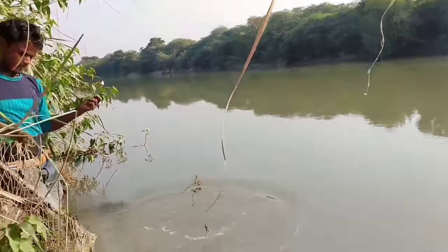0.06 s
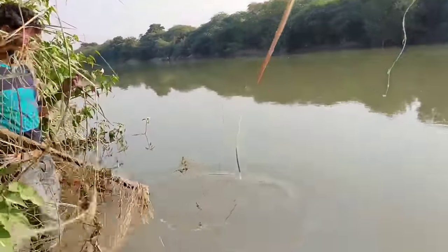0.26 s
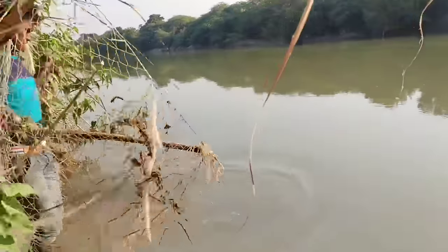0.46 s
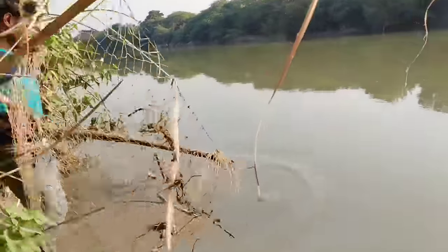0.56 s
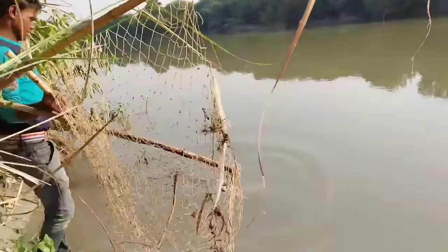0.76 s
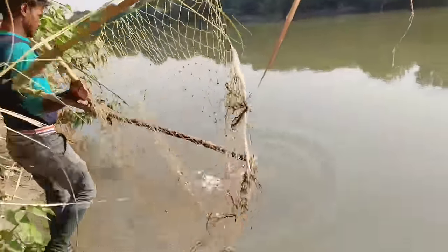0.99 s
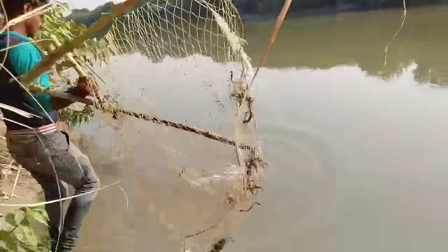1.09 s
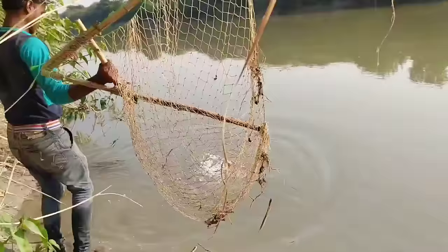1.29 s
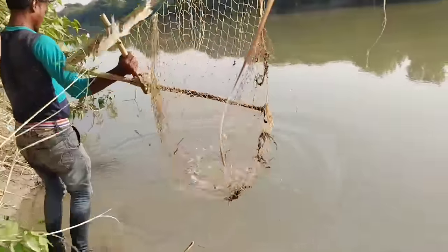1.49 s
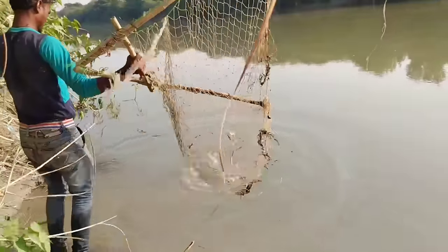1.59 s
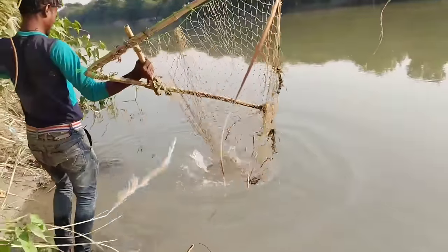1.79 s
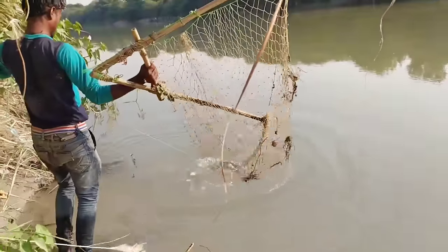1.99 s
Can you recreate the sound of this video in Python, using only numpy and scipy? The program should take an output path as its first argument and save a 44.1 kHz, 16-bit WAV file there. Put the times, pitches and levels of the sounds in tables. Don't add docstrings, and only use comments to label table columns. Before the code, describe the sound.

Close stereo outdoors by a river: crackly net dragged through grass with stalks clicking, then midway a fish smacks the water, gurgling and frothing in short bursts while rustling continues, above a quiet low hum.

```python
import sys
import numpy as np
from scipy import signal
from scipy.io import wavfile
from scipy.ndimage import uniform_filter1d

SR = 44100
rng = np.random.default_rng(int(sys.argv[2]) if len(sys.argv) > 2 else 0)


def materialize(psi):
    bounded = np.clip(np.atleast_2d(psi).T, -1, 1)
    quanta = np.round(bounded * 32767).astype(np.int16)
    wavfile.write(sys.argv[1], SR, quanta)


def invert_db(x):
    u = np.asarray(x, float) / 20
    return 10 ** u


N = 90404


def evened(x):
    return x / np.sqrt(np.mean(x ** 2) + 1e-20)


def read(points, hz):
    f, value = np.transpose(points)
    return np.interp(np.log(hz + 1), np.log(f + 1), value)


def add(mix, s, sound):
    part = mix[round(s * SR):][:len(sound)]
    part += sound[:len(part)]


def colour(x, db):
    hz = abs(np.fft.fftfreq(4096, 1 / SR))
    log_gain = np.log(invert_db(np.maximum(db(hz), -100)))
    taps = np.fft.ifft(np.exp(np.conj(signal.hilbert(log_gain)))).real[:2048]
    return signal.oaconvolve(x, taps)[:N]


def pair(a, b, same, lag, patch_db, size):
    hz, t, z = signal.stft(np.array([a, b]), SR, nperseg=size)
    likeness = np.clip(read(same, hz), 0, 1)[:, None]
    patches = uniform_filter1d(rng.standard_normal(z.shape[1:]), 5, 0)
    patches = evened(uniform_filter1d(patches, 9, 1))
    delay = np.exp(-2j * np.pi * hz * lag / SR)[:, None]
    left = likeness * z[0] * delay + np.sqrt(1 - likeness ** 2) * z[1]
    both = np.array([left, z[0]]) * invert_db(patch_db * patches)
    return signal.istft(both, SR, nperseg=size)[1][:, :N]


def hum():
    # (frequency [Hz], level [dB per Hz])
    hum_spectrum = [(12, -35.5), (20, 4.5), (77, -6), (123, -13), (174, -2.5), (633, -19), (686, -16.5),
                    (1160, -22), (2500, -14), (3250, -18), (5500, -120)]
    # (frequency [Hz], likeness [0-1])
    hum_same = [(25, 0.69), (60, 0.73), (200, 0.84), (500, 0.44), (1200, 0.085), (2500, 0.045)]
    bump_hz, bump_width, bump_db = 169, 0.091, 0.5

    def shape(hz):
        bump = bump_db * np.exp(-(np.log(hz / bump_hz + 1e-9) / bump_width) ** 2)
        return read(hum_spectrum, hz) + bump - 30 * (hz > 3000)

    a, b = (colour(noise, shape) for noise in rng.standard_normal((2, N)))
    return invert_db(-51) * evened(pair(a, b, hum_same, lag=0, patch_db=.6, size=1024))


def crackle(spread_db):
    ticks_per_s = 12000
    unevenness = np.minimum(rng.exponential(1, N), 5)
    size = invert_db(spread_db * unevenness) * rng.standard_normal(N)
    return evened(size * (rng.random(N) < ticks_per_s / SR))


def ticks(level, points, spread_db):
    # (frequency [Hz], likeness [0-1])
    rustle_same = [(900, 0.71), (3000, 0.23), (8000, 0.026), (15000, 0.4)]
    impulse = np.zeros(4096)
    impulse[0] = 1

    def shape(hz):
        return read(points, hz) - 30 * (hz < 700)

    gain = np.linalg.norm(colour(impulse, shape))
    sides = [colour(level * crackle(spread_db), shape) / gain for _ in "LR"]
    return pair(*sides, rustle_same, lag=22, patch_db=1.2, size=256)


def streaked(x):
    # (frequency [Hz], depth [dB])
    streak_depth = [(2200, 0), (3200, 8), (6200, 7.5), (7300, 2), (10500, 2), (12500, 5.5), (15500, 6)]
    hz, t, z = signal.stft(x, SR, nperseg=1024)
    field = rng.standard_normal((1, 129, len(t))).repeat(4, 1)[:, :513]
    field = evened(uniform_filter1d(field, size=3, axis=2))
    depth = read(streak_depth, hz)[:, None]
    gain = invert_db(depth * np.minimum(field, .8))
    return signal.istft(z * gain, SR, nperseg=1024)[1][:, :N]


def net():
    # (time [s], level [dB])
    drag_level = [(0, -46.5), (.19, -42), (.28, -41.5), (.39, -29.5), (.45, -30.5), (.55, -37.5),
                  (.68, -33), (.78, -41.5), (.87, -40), (.95, -42), (1.08, -37), (1.24, -34.5),
                  (1.31, -42.5), (1.36, -31), (1.57, -37.5), (1.66, -43), (1.72, -39), (1.82, -45)]
    # (time [s], level [dB], length [s], dull share [0-1])
    stalks = [(0.118, -44, 0.0055, 0), (0.2201, -23.5, 0.0016, 0.17), (.2223, -26, 0.0009, 0.1),
              (0.2235, -16, 0.0011, 0.02), (0.405, -29, 0.02, 0), (0.417, -28.5, 0.019, 0),
              (.44, -42, 0.027, 0), (0.516, -36, .002, .3), (0.5197, -25, .0045, 0.53),
              (0.5223, -28, 0.0072, 0.33), (0.577, -29, 0.0045, 0.27), (0.646, -40, 0.022, 0),
              (0.814, -31, 0.0033, 0), (0.86, -38.5, 0.011, 0), (0.911, -34.5, 0.0046, 0),
              (0.954, -37.5, 0.0044, .1), (1.123, -38, 0.0046, 0.56), (1.247, -41, 0.036, 0.04),
              (1.3274, -39.5, .013, 0), (1.3648, -33.5, .006, 0.2), (1.455, -36.5, 0.029, 0.2),
              (1.4875, -35, 0.0042, 0.1), (1.522, -38, 0.03, 0.23), (1.532, -35, .004, 0.1),
              (1.553, -35.5, 0.036, 0.03), (1.568, -37, 0.0048, 0), (1.639, -44, .004, 0.2),
              (1.684, -33.5, 0.009, 0.28), (1.7, -29.5, 0.002, 0.23), (1.703, -39, 0.023, 0),
              (1.709, -37, 0.0047, 0), (1.727, -40, 0.0048, 0), (1.75, -40, .005, 0.1),
              (1.771, -39, 0.0046, 0.1), (1.8811, -39, 0.0054, .1), (1.9919, -59, .005, 0)]
    # (frequency [Hz], level [dB per Hz])
    fibre_spectrum = [(2500, -43.5), (4000, -29.5), (5200, -16), (6300, -13.5), (8580, -2.5), (11000, -12),
                      (15600, -20.5)]
    blade_spectrum = [(530, -47), (1040, -5.5), (1600, -15), (2510, 0.5), (3250, -7), (4000, -1.5),
                      (5800, -7), (8000, -23)]
    snap_spectrum = [(700, -59), (1500, -25), (2300, -20.5), (4200, -14.5), (6500, -1), (9000, 2),
                     (12000, -10), (15700, -22)]
    thick_spectrum = [(700, -19), (1500, -13.5), (2200, 0), (3200, -10), (4600, -4), (6000, -9),
                      (9000, -12), (15700, -9.5)]
    # (frequency [Hz], level [dB])
    bright_left = [(3000, .5), (5500, -1.2), (9000, -.6), (15000, 4.5)]
    rise_s, tail_s, tail_db = .0004, .006, -13
    scrape_over_s = .012
    flicker_db, spread_db = .6, 1.9

    t = np.arange(N) / SR
    flicker = uniform_filter1d(rng.standard_normal(N), 500)
    flicker = evened(uniform_filter1d(flicker, 300))
    drag = invert_db(np.interp(t, *np.transpose(drag_level)) + flicker_db * flicker) ** 2
    bright, dull = np.zeros(N), np.zeros(N)
    u = t[:4000]
    for s, db, length, share in stalks:
        tail = invert_db(tail_db) * np.exp(-(u - length) / tail_s).clip(0, 1)
        shape = np.minimum(u / rise_s, 1) * np.maximum(u < length, tail)
        target = drag if length > scrape_over_s else bright
        add(target, s, (invert_db(db) * shape) ** 2)
        add(dull, s, (share * invert_db(db) * shape) ** 2)

    swish = invert_db(-50) * (np.sqrt(drag) / invert_db(-38)) ** 0.51
    rustle = ticks(np.sqrt(drag), fibre_spectrum, spread_db)
    rustle = rustle + ticks(swish, blade_spectrum, spread_db)
    snaps = ticks(np.sqrt(bright), snap_spectrum, 0)
    thuds = ticks(np.sqrt(dull), thick_spectrum, 0)
    left, right = streaked(rustle) + snaps + thuds
    left = colour(left, lambda hz: read(bright_left, hz) / 2)
    right = colour(right, lambda hz: -read(bright_left, hz) / 2)
    return np.array([left, right])


def bubble(db, hz, length):
    climb, skew = .08, .7
    u = np.arange(0, length, 1 / SR) / length
    turns = hz * length * (u * (1 - climb / 2) + climb * u ** 2 / 2)
    swell = abs(np.sin(np.pi * u ** skew))
    return invert_db(db) * swell * np.sin(2 * np.pi * turns)


def froth():
    # (start [s], length [s], level [dB])
    churn = [
        (1.122, 0.24, -48.5),
        (1.296, 0.11, -51.5),
        (1.37, 0.08, -44.5),
        (1.419, 0.2, -48),
        (1.597, 0.08, -53.5),
        (1.758, 0.031, -50.5),
        (1.842, .24, -51),
    ]
    bubbles_per_s, spread_db, tilt_db_per_octave = 1800, 2.5, 1.5
    t, level = np.arange(N) / SR, np.zeros(N)
    for s, length, db in churn:
        u = np.clip((t - s) / length, 0, 1)
        level += invert_db(db) * abs(np.sin(np.pi * u ** 0.54)) ** .5
    size = invert_db(spread_db * np.minimum(rng.exponential(1, N), 4))
    size = size * (rng.random(N) < bubbles_per_s / SR)
    kind = rng.integers(0, 30, N)
    steady, churned = np.zeros(N), np.zeros(N)
    for k, hz in enumerate(np.geomspace(420, 3000, 30)):
        tone = bubble(tilt_db_per_octave * np.log2(hz / 1000), hz, 6 / hz + 0.004)
        births = size * (kind == k)
        steady += signal.oaconvolve(births, tone)[:N]
        churned += signal.oaconvolve(births * level, tone)[:N]
    return churned / np.std(steady)


def slap():
    # (frequency [Hz], level [dB per Hz])
    smack_spectrum = [(150, -12), (500, -7), (1300, -8), (2500, -4), (3500, -14), (8000, -37)]
    smack_s, smack_db, smack_rise_s, smack_fade_s = 1.1205, -31, 0.00084, .0045
    cavity_s, cavity_db, cavity_hz, cavity_rise_s, cavity_fade_s = 1.123, -33, 158, .008, .05
    t, out = np.arange(8000) / SR, np.zeros(N)
    puff = colour(rng.standard_normal(8000), lambda hz: read(smack_spectrum, hz))
    puff = evened(puff[:8000])
    envelope = np.minimum(t / smack_rise_s, 1) * np.exp(-t / smack_fade_s)
    add(out, smack_s, invert_db(smack_db) * puff * envelope)
    ring = (1 - np.exp(-t / cavity_rise_s)) * np.exp(-(t / cavity_fade_s) ** 1.7)
    add(out, cavity_s, invert_db(cavity_db) * ring * np.sin(2 * np.pi * cavity_hz * t))
    return out


def fish():
    # (time [s], level
    # [dB], pitch [Hz], length [s])
    cavities = [(1.12, -35.5, 1255, .009), (1.121, -34, 885, 0.01), (1.121, -32.5, 390, 0.0062),
                (1.123, -27.5, 618, 0.0093), (1.121, -36.5, 2400, 0.0056), (0.8, -42, 1900, 0.007),
                (1.4, -46, 1400, .005), (1.135, -41, 2080, 0.0051), (1.3, -38, 800, 0.0098),
                (1.134, -37, 560, 0.0091), (0.42, -55, 175, 0.041), (0.66, -45.5, 165, .04),
                (.255, -48.5, 217, 0.028), (.444, -49, 1050, 0.014), (.482, -45.5, 1900, 0.0082),
                (1.152, -44, 780, .012), (1.198, -38, 207, 0.013), (1.203, -46, 700, 0.018),
               (1.221, -41.5, 262, 0.013), (1.266, -43.5, 780, 0.0079), (1.294, -36.5, 975, 0.0088),
               (1.303, -39.5, 960, 0.007), (1.325, -26, 378.7, 0.022), (1.345, -43, 422, 0.035),
               (1.373, -35, 460, 0.011), (1.379, -39.5, 900, .009), (1.39, -34.5, 746, 0.0096),
               (1.401, -30, 690, 0.008), (1.408, -33, 740, 0.0058), (1.415, -41, 695, 0.0088),
               (1.433, -46, 1250, 0.0086), (1.506, -46, 1015, 0.025), (1.524, -49, 695, 0.012),
               (1.548, -52, 662, .012), (1.645, -48, 1430, 0.019), (1.675, -41.5, 584, 0.013),
               (1.777, -45.5, 800, 0.014), (1.858, -45.5, 740, .012), (1.866, -44, 1103, 0.012),
               (1.882, -47.5, 295, 0.026), (1.909, -40, 742, 0.018), (1.936, -39, 1750, 0.013),
               (1.945, -48.5, 1760, 0.017), (1.953, -45, 2480, 0.011), (1.959, -42, 1196, 0.0091),
               (1.836, -48, 2760, 0.012), (1.912, -49, 1160, .012), (1.956, -50, 393, 0.019),
               (1.39, -40.5, 398, 0.014), (1.397, -46, 600, 0.0055), (1.404, -41, 1790, 0.027),
               (1.41, -41, 1050, .008), (2.008, -52, 420, 0.013), (2.042, -40.5, 1740, 0.0078)]
    # (frequency [Hz], likeness [0-1])
    water_same = [(150, .99), (500, .97), (1000, .85), (1500, .5), (2500, .3)]
    mono = froth() + slap()
    for s, db, hz, length in cavities:
        add(mono, s, bubble(db, hz, length))
    scatter = rng.standard_normal(300) * np.exp(-np.arange(300) / 80)
    scattered = signal.oaconvolve(mono, scatter / np.linalg.norm(scatter))[:N]
    both = pair(mono, scattered, water_same, lag=4, patch_db=0, size=512)
    return both * invert_db(np.array([[-.1], [.1]]))


def scene():
    return net() + fish() + hum()


def low_pass(x):
    return signal.sosfilt(signal.butter(12, 15800, fs=SR, output="sos"), x)


def record(dry):
    lowpass = signal.firwin(1023, 15600, window=("kaiser", 10), fs=SR)
    limited = signal.oaconvolve(dry, lowpass[None], "same")
    return low_pass(limited)


dry = scene()
out = record(dry)
materialize(out)
```